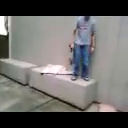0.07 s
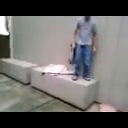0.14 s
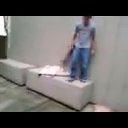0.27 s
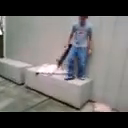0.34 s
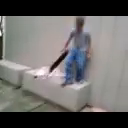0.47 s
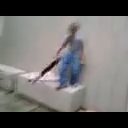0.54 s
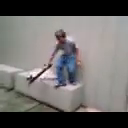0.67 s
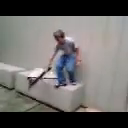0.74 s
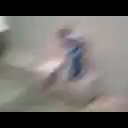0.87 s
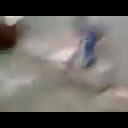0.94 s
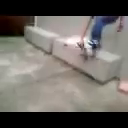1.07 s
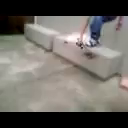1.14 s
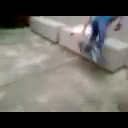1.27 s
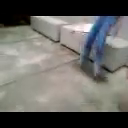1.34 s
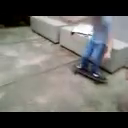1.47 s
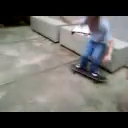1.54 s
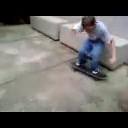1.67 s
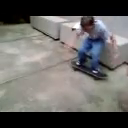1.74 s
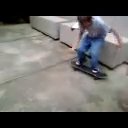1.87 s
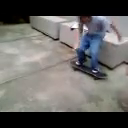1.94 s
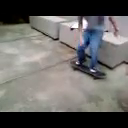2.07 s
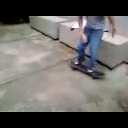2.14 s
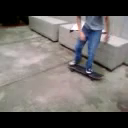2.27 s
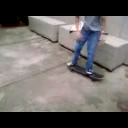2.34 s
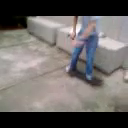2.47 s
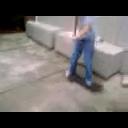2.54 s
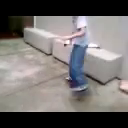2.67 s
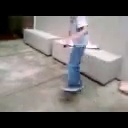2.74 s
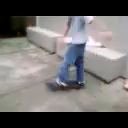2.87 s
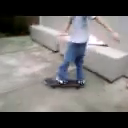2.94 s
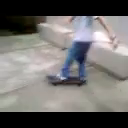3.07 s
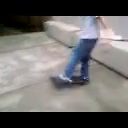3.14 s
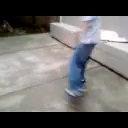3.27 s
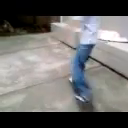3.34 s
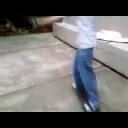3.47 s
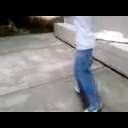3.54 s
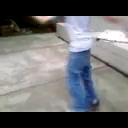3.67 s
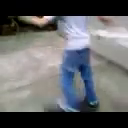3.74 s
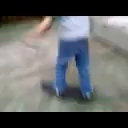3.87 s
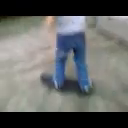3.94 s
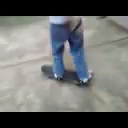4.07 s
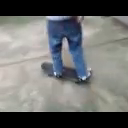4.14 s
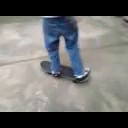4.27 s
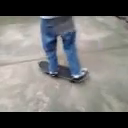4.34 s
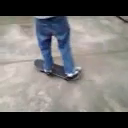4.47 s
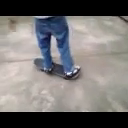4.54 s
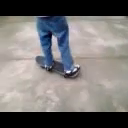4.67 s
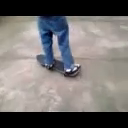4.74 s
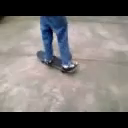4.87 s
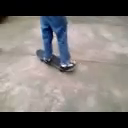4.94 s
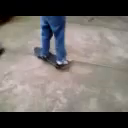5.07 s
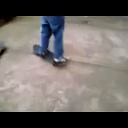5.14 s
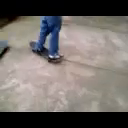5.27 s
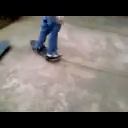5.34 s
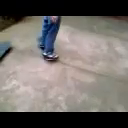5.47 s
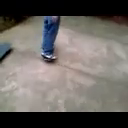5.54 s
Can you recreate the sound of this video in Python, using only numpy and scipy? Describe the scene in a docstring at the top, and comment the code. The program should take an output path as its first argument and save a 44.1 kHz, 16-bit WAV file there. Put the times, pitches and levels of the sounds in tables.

```python
"""Skateboard drop in a walled yard

A skater jumps off a concrete block, lands hard on the board and rolls away, the deck rumbling.
He pivots three times: urethane wheels scrub and squeal, the nose slaps down and rings the deck.
The trucks creak in runs of tiny slips as he leans into a turn, and the walls echo over a soft hush.
A small camera with a telephone-like band picks it up and overloads on the landing."""
import sys
import numpy as np
from scipy import signal
from scipy.fft import rfft, irfft
from scipy.io import wavfile

SR = 44100
rng = np.random.default_rng(int(sys.argv[2]) if len(sys.argv) > 2 else 0)


def generate_wav(sig):
    """Save sig (samples, or channels by samples) to the path in sys.argv[1] as 16-bit PCM at SR."""
    pcm = np.round(np.clip(np.atleast_2d(sig).T, -1, 1) * 32767).astype(np.int16)
    wavfile.write(sys.argv[1], SR, pcm)


N = 247370
T = np.arange(N) / SR
LANDING_S = 1.7595

# edges of the board's three registers, low thud, middle knock and high clack: f/Hz
REGISTER_EDGES = [215, 700, 1900, 3700]


def undb(db):
    """Decibels to gain."""
    return 10 ** (np.asarray(db) / 20)


def unit(x):
    """Scale to rms 1."""
    return x / np.sqrt(np.mean(x ** 2))


def add(out, start, sound):
    """Mix a sound in at its time."""
    i = max(int(start * SR), 0)
    out[i:i + len(sound)] += sound[:max(N - i, 0)]


def band(x, lo_hz, hi_hz, order=2):
    """Causal band-pass."""
    return signal.sosfilt(signal.butter(order, [lo_hz, hi_hz], "band", fs=SR, output="sos"), x)


def colour(x, points, size=4096):
    """Minimum-phase EQ through points of f/Hz, level/dB."""
    hz, db = np.transpose(points)
    log_gain = np.log(undb(np.interp(np.log(np.fft.rfftfreq(size, 1 / SR) + 1), np.log(hz), db)))
    cepstrum = irfft(log_gain)[:size // 2]
    cepstrum[1:] *= 2
    return signal.fftconvolve(x, irfft(np.exp(rfft(cepstrum, size))))[:len(x)]


def shaped(x, points):
    """EQ an excitation and scale it to rms 1 across the three registers."""
    y = colour(x, points)
    return y / band(y, REGISTER_EDGES[0], REGISTER_EDGES[-1]).std()


def walk(rate):
    """Smooth random drift with a spread near 1."""
    knots = np.arange(0, T[-1] + 1, 1 / rate)
    return np.interp(T, knots, rng.standard_normal(len(knots)))


def grit(rate, spread_db):
    """Random clicks, many small and a few large."""
    sizes = undb(spread_db * np.minimum(rng.exponential(size=N), np.pi))
    return (rng.random(N) < rate / SR) * sizes * rng.standard_normal(N)


def contact(decay_ms, softness=0.018, size=8192):
    """Parts chatter against each other for milliseconds; long, soft contacts have a slower attack."""
    ms = np.arange(size) * 1000 / SR
    rise_ms = softness * decay_ms ** 2
    return rng.standard_normal(size) * (1 - np.exp(-ms / rise_ms)) * np.exp(-ms / decay_ms)


def burst_level(x, db, decay_ms):
    """Scale a burst so that its energy equals that level held for its decay time."""
    samples = decay_ms * SR / 1000
    return x * undb(db) * np.sqrt(samples / np.sum(x ** 2))


def singing(hz, width_hz):
    """A noise-driven resonance whose centre moves; rms 1."""
    lowpass = signal.butter(2, width_hz / 2, fs=SR, output="sos")
    drive = signal.sosfilt(lowpass, rng.standard_normal((2, len(hz))))
    phase = 2 * np.pi * np.cumsum(hz) / SR
    return unit(drive[0] * np.cos(phase) + drive[1] * np.sin(phase))


def hush(air_db=-55.5, flicker_db=1):
    """A bed of outdoor air, swelling where clothes and soles rustle as he steps up and jumps."""
    # tone of the air: f/Hz, level/dB
    air_eq = [(25, -22.5), (70, -10), (160, -5), (310, 5.5), (420, 2.5), (650, 0), (1200, 4), (1850, 7),
              (2450, 0), (3200, 3), (4000, -4.5)]
    # rustle swells: t/s, half length/s, level/dB
    rustles = [(0.12, .17, -52), (0.87, .11, -54), (1.6, .14, -52.5)]
    swells = sum(undb(db) ** 2 * np.exp(-((T - s) / half_s) ** 2) for s, half_s, db in rustles)
    envelope = np.sqrt(undb(air_db) ** 2 + swells)
    return shaped(rng.standard_normal(N), air_eq) * envelope * undb(flicker_db * walk(24))


def deck_ring(force, detune=0.018, scatter_db=1.5):
    """A force cracks and rings the deck; the feet load its modes a little differently each time."""
    # modes of deck and trucks: f/Hz, level over the plain crack/dB, t60/s
    deck_modes = [(290, -1, 0.17), (343.7, 0.5, 0.033), (555, 4.5, 0.021), (687, -2.5, .12),
                  (838, -1, 0.12), (956, -5.5, 0.17), (1392, 3.5, .05), (1590, 2, .045), (1820, 2, .035),
                  (2349, -11.5, .022), (2590, -12, 0.26), (2787, 5.5, 0.054), (3107, 3.5, .05),
                  (3434, 1, .04)]
    t = T[:len(force)]
    response = np.zeros(len(t))
    response[0] = 1  # the plain crack
    for hz, db, t60 in deck_modes:
        damping = np.log(1000) / t60
        sharper, louder = rng.standard_normal(2)
        mode = np.exp(-damping * t) * np.cos(2 * np.pi * hz * (1 + detune * sharper) * t)
        response += undb(db + scatter_db * louder) * 2 * damping / SR * mode
    return signal.fftconvolve(force, response)[:len(force)]


def strike(contact_ms, db, tilt_db, thud_hz, knock_hz, clack_hz=2437, ground_db=-18):
    """One blow rings the deck and thumps the ground; a harder contact tilts it from thud to clack."""
    force = contact(contact_ms)
    ring = deck_ring(force)
    out = burst_level(band(force, 60, 260, order=1), db - tilt_db / 2 + ground_db, contact_ms)
    # where the board is hit sets the peak leading each register: f/Hz, width/Hz, bleed of the ring/dB
    peaks = [(thud_hz, 130, -14), (knock_hz, 150, -12), (clack_hz, 300, -11)]
    for k, (hz, width_hz, bleed_db) in enumerate(peaks):
        peak = signal.lfilter(*signal.iirpeak(hz, hz / width_hz, fs=SR), ring)
        register = band(peak + undb(bleed_db) * ring, REGISTER_EDGES[k], REGISTER_EDGES[k + 1], order=3)
        out += burst_level(register, db + (k - 1) * tilt_db / 2, contact_ms)
    return out


def knocks():
    """Shoes meet the deck and the board bounces or shifts under them."""
    # single hits: t/s, contact/ms, level/dB, clack over thud/dB, thud/Hz, knock/Hz
    hits = [ (0.129, 16, -48, -7.5, 384, 1390), (0.882, 5.7, -54, -9, 450, 1420),
            (1.332, 5.3, -56.5, 7.5, 456, 1410), (1.564, 10.4, -39, 7.5, 503, 1200),
            (1.622, 20, -51.5, 14, 500, 1460), (1.6933, 4.3, -23.5, 10.5, 495, 1165),
            (1.716, 24.2, -38.5, -2.5, 545, 1200), (1.807, 16.6, -16, -3, 635, 880),
            (1.851, 5.3, -24, -15, 650, 1500), (1.872, 5.1, -14, -2.5, 510, 1400),
            (1.879, 5.3, -20.5, -8.5, 255, 690), (1.903, 17, -29, -4, 590, 960),
            (2.501, 8.1, -43.5, 9, 550, 1630), (2.520, 11.3, -36, -1.5, 546, 1036),
            (2.573, 13, -46.5, 15, 498, 1710), (2.719, 9.1, -43, -16.5, 392, 884),
            (2.740, 13.4, -41, 11, 450, 1020), (2.872, 2.8, -47.5, 0, 461, 1270),
            (4.829, 6.9, -45, -1, 467, 1302)]
    out = np.zeros(N)
    for start, *blow in hits:
        add(out, start, strike(*blow))
    return out


def skids(upper_ratio=1.22, rasp_db=-12, fade_db=-13, chatter_db=2.0, edge_s=.008):
    """Urethane sticks and slips: a rough squeal with an upper partial, over a sandy rasp."""
    # sideways scrubs: start/s, end/s, level/dB, f/Hz, glide/Hz, width/Hz, upper partial/dB
    scrubs = [(1.43, 1.584, -55.5, 2193, 24, 700, -1), (1.98, 2.097, -32.5, 2556, -26.5, 350, -8.5),
              (2.161, 2.199, -38, 2370, 30, 200, -17), (2.596, 2.679, -49, 2584, 118.5, 700, -5),
              (2.923, 3.119, -51.5, 2344, 325.5, 600, -11), (3.105, 3.275, -30, 2506, 330, 380, -9),
              (3.919, 4.031, -38.5, 2950, -110, 600, -24), (4.051, 4.189, -45.5, 2500, 82, 350, -4.5),
              (4.447, 4.542, -39.5, 2515, 59, 600, -0.5), (4.517, 4.76, -50, 2493, 2.5, 500, 3.5),
              (5.133, 5.335, -57, 2980, -3, 350, -21.5), (5.517, 5.656, -40, 2460, 20.5, 650, -4)]
    rasp = unit(band(grit(rate=2000, spread_db=3.5), 1900, 3700))
    out = np.zeros(N)
    t = T[:SR // 2]
    for start, end, db, pitch_hz, glide_hz, width_hz, upper_db in scrubs:
        progress = np.minimum(t / (end - start), 1)
        gate = np.clip(np.minimum(t, end - start - t) / edge_s, 0, 1)
        envelope = gate * undb(db + fade_db * progress ** 3)  # holds, then dies as the wheels grip
        pitch = pitch_hz + glide_hz * progress
        squeal = unit(np.tanh(singing(pitch, width_hz)))  # friction caps the swing
        upper = undb(upper_db) * singing(upper_ratio * pitch, width_hz)
        sand = undb(rasp_db) * np.roll(rasp, -int(start * SR))[:len(t)]
        add(out, start - edge_s / 2, (squeal + upper + sand) * envelope)
    return out * undb(chatter_db * walk(130))


def landing(contact_ms=6.77, thud_hz=340):
    """The four wheels hit the concrete in quick succession under the skater's full weight."""
    # wheel impacts: delay/s, level/dB, clack over thud/dB, knock/Hz
    wheels = [(0, -7.5, -2.5, 1225), (.0095, -7.5, 9, 1295), (.0175, -3.5, 5, 900), (0.0279, -6.5, 1, 1580)]
    out = np.zeros(N)
    for delay_s, db, tilt_db, knock_hz in wheels:
        add(out, LANDING_S + delay_s, strike(contact_ms, db, tilt_db, thud_hz, knock_hz))
    return out


def rolling(rumble_trim_db=3, grain_trim_db=3.5, patchy_db=2.5, sag_hz_per_db=10):
    """The loaded deck rumbles as the wheels run over grainy concrete, which is rougher in patches."""
    # fader moves that follow speed and load, ahead of the trims: t/s, rumble/dB, grain/dB
    faders = [(2.2, -67, -64), (2.49, -70.5, -59.5), (2.64, -65.5, -69.5), (2.93, -61, -57),
              (3.2, -63.5, -63), (3.34, -64, -59), (3.49, -53, -52), (3.68, -50.5, -53), (3.83, -54, -58),
              (3.96, -47, -44.5), (4.21, -47.5, -51.5), (4.42, -64, -58), (4.65, -61.5, -52.5),
              (4.85, -57, -50.5), (5.13, -59, -62), (5.32, -58.5, -57.5), (5.5, -53, -51.5),
              (5.6, -53.5, -45.5)]
    # tone of the concrete's grain: f/Hz, level/dB
    grain_eq = [(40, -13), (130, -8), (300, -4), (750, -5), (1250, 4), (1800, 0.5), (2300, -2),
                (3000, -5.5), (3800, -12)]
    times, *levels = np.transpose(faders)
    rumble_db, grain_db = (np.interp(T, times, level) for level in levels)
    rumble_hz = 421 - sag_hz_per_db * (rumble_db + 53)  # a heavier load sounds louder and lower
    rumble = unit(band(singing(rumble_hz, width_hz=240), 150, 900)) * undb(rumble_db + rumble_trim_db)
    # the wheels grind under the weight of the landing, then ease off
    peak_s, peak_db, rise_db_per_s, fall_db_per_s = 1.96, -38, 399.5, 94.5
    grind = undb(peak_db + np.minimum(rise_db_per_s * (T - peak_s), fall_db_per_s * (peak_s - T)))
    grain_envelope = np.hypot(grind, undb(grain_db + grain_trim_db))
    grain = shaped(grit(rate=2000, spread_db=3.0), grain_eq) * grain_envelope
    return (rumble + grain) * undb(patchy_db * walk(35)) * (T > LANDING_S)


def slaps(graze_db=-6, graze_ms=4.36):
    """After each pivot the front wheels graze the ground, slam down and rebound."""
    # nose drops: t/s, graze lead/s, level/dB, clack over thud/dB, thud/Hz, knock/Hz, clack/Hz
    drops = [(3.313, 0.0091, -11, 3, 381, 1090, 2580), (3.784, 0.0039, -14.5, -5.5, 429, 1150, 2640),
             (4.268, .005, -10, -3, 511, 1164, 2460)]
    # blow, other wheel, duller rebound: delay/s, level offset/dB, contact/ms, extra clack over thud/dB
    bounces = [(0, 0, 3.84, -1), (.013, -7.5, 4.4, 0), (.035, -13, 7.5, -4)]
    out = np.zeros(N)
    for start, lead_s, db, tilt_db, *peaks_hz in drops:
        graze = (-lead_s, graze_db, graze_ms, 0)
        for delay_s, offset_db, contact_ms, harder_db in [graze, *bounces]:
            add(out, start + delay_s, strike(contact_ms, db + offset_db, tilt_db + harder_db, *peaks_hz))
    return out


def creaks(decay_ms=2.8, trim_db=3, jitter=.04, scatter_db=1, max_slips=8):
    """A truck bushing sticks and slips almost evenly as he leans; each slip is a short bright tick."""
    # runs of slips: start/s, end/s, spacing/s, level before trim/dB, swell/dB
    runs = [(4.538, 4.61, 0.016, -42, 9.5), (4.638, 4.658, 0.0092, -37.5, -15),
            (4.683, 4.717, 0.014, -35.5, -0.5), (4.723, 4.81, 0.027, -46, -1.5),
            (5.489, 5.504, .011, -41, 6), (5.523, 5.59, 0.03, -35.5, 1)]
    # tone of a tick: f/Hz, level/dB
    tick_eq = [(200, -17), (800, -26.5), (1300, -9), (2100, -7), (2450, 6), (2800, -6), (3150, 1.5),
               (3500, -2.5), (4200, -15.5)]
    out = np.zeros(N)
    for start, end, gap_s, db, swell_db in runs:
        for slip in range(max_slips):
            late, louder = rng.standard_normal(2)
            tick = colour(contact(decay_ms, size=4096), tick_eq)
            tick = band(tick, REGISTER_EDGES[0], REGISTER_EDGES[-1])
            progress = slip * gap_s / (end - start)
            if progress < 1:
                slip_db = db + trim_db + swell_db * progress + scatter_db * louder
                add(out, start + (slip + jitter * late) * gap_s, burst_level(tick, slip_db, decay_ms))
    return out


def yard(x, early_db=-11, early_t60=0.1378, late_db=-16, late_t60=0.54, build_s=0.021):
    """The blocks and the near wall answer at once; the far walls leave a longer tail."""
    # EQ on the reverb return: f/Hz, level/dB
    wall_eq = [(100, -12), (350, -7.5), (700, -2.5), (1500, 3.5), (2500, -4.0), (3500, 1.0)]
    t = T[:SR]
    build_up = 1 - np.exp(-(t / build_s) ** 2)
    response = np.zeros(SR)
    for db, t60 in ((early_db, early_t60), (late_db, late_t60)):
        echoes = rng.standard_normal(SR) * build_up * np.exp(-np.log(1000) * t / t60)
        response += undb(db) * echoes / np.sqrt(np.sum(echoes ** 2))
    return colour(signal.fftconvolve(x, response)[:N], wall_eq)


def scene():
    """The board and its echoes over the outdoor hush, in mono."""
    board = landing() + slaps() + knocks() + rolling() + skids() + creaks()
    return (board + yard(board) + hush())[None]


def record(dry, ceiling=0.71, high_cut_hz=15900):
    """The camera passes little above the speech band and flattens the tallest peaks."""
    # the camera's narrow response: f/Hz, level/dB
    camera_eq = [(20, -1.5), (3100, -3), (3400, -7.5), (3700, -11.5), (4000, -16.5), (4400, -27),
                 (4900, -52.5), (6000, -72.5)]
    clipped = np.clip(colour(dry[0], camera_eq), -ceiling, ceiling)
    high_cut = signal.ellip(8, .2, 70, high_cut_hz, fs=SR, output="sos")
    return signal.sosfilt(high_cut, clipped)[None]


dry = scene()
out = record(dry)
generate_wav(out)
```